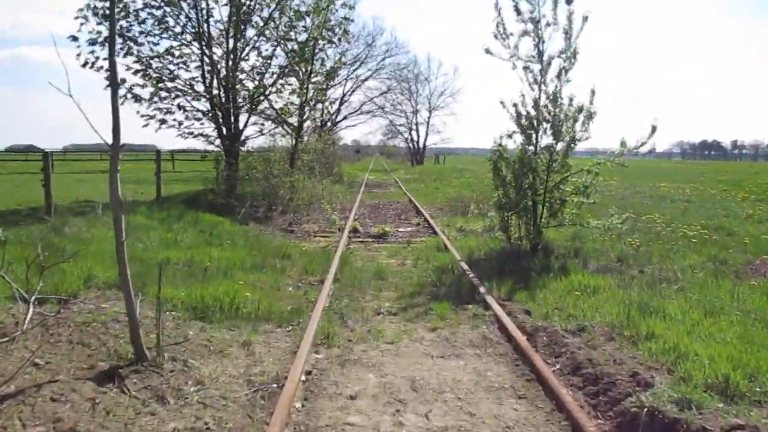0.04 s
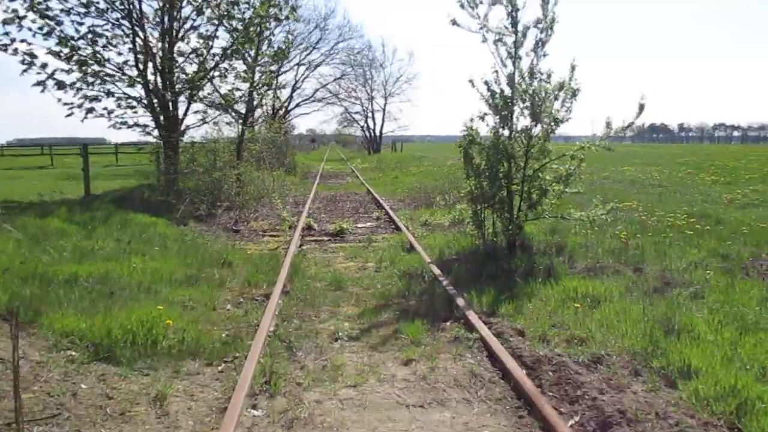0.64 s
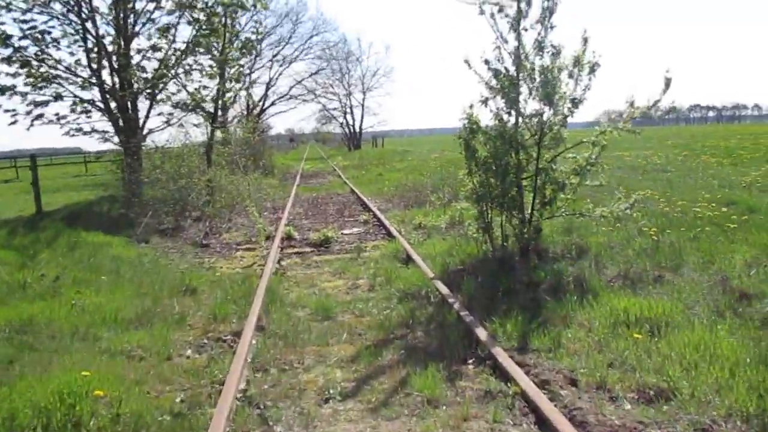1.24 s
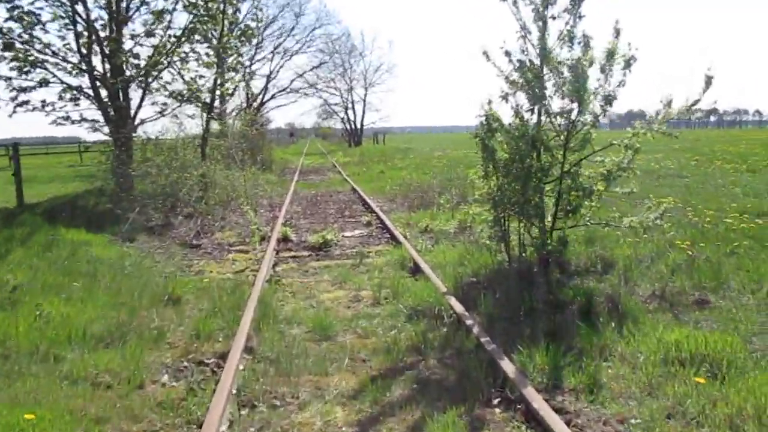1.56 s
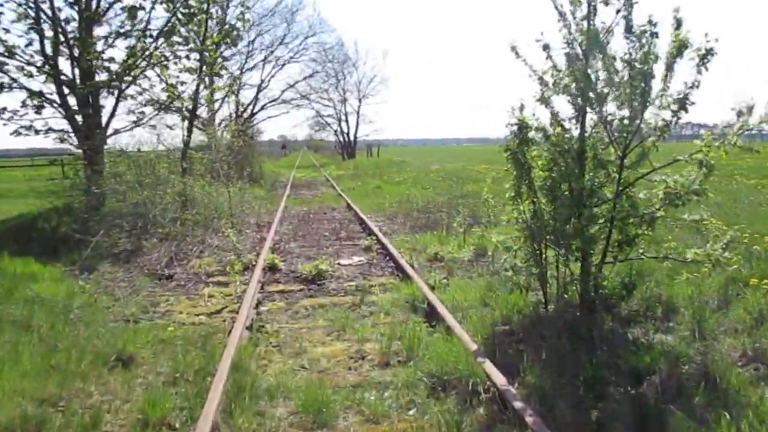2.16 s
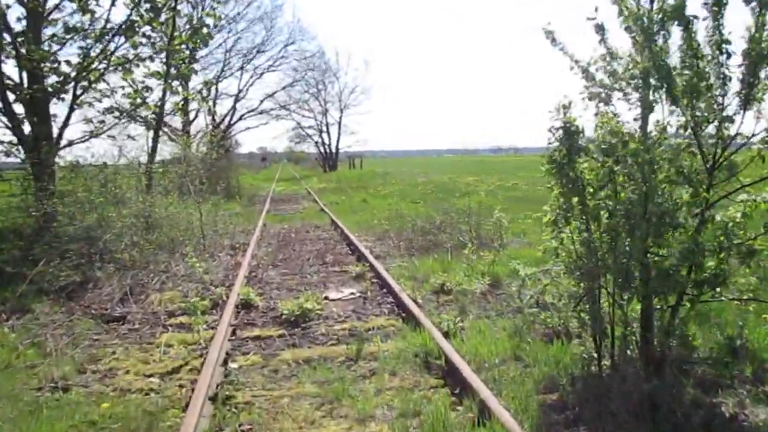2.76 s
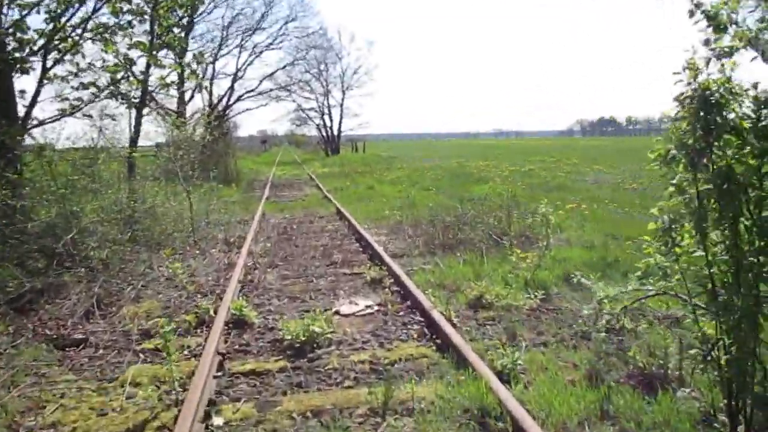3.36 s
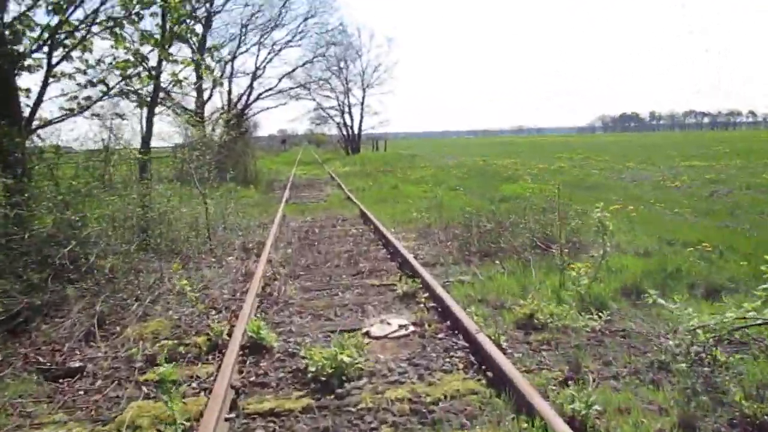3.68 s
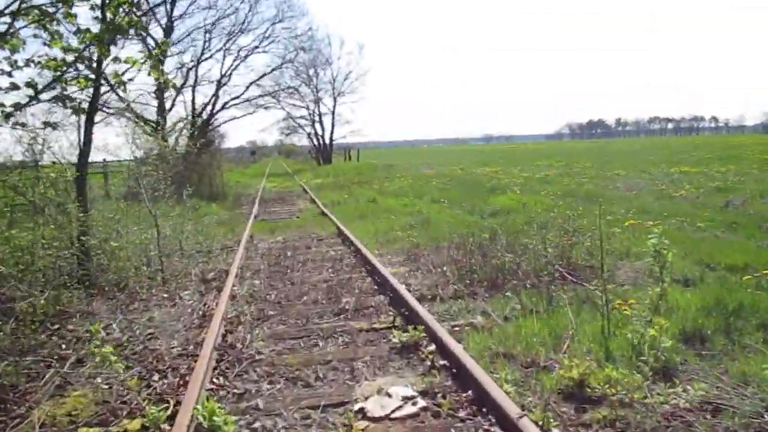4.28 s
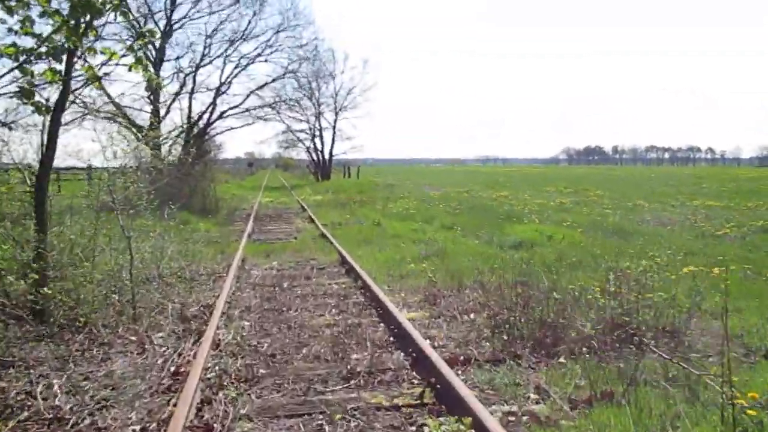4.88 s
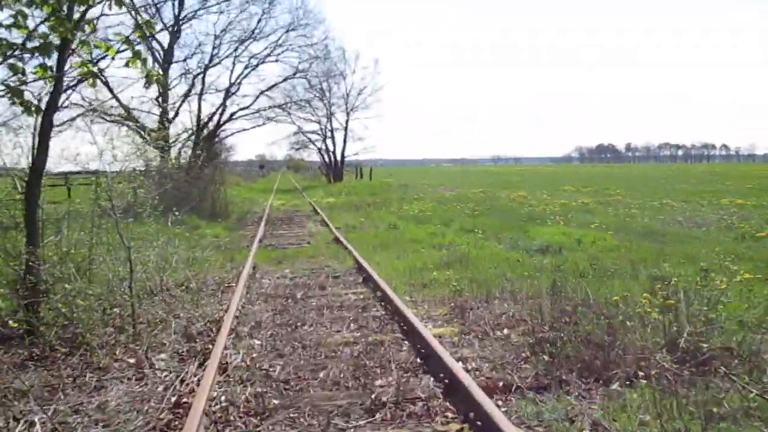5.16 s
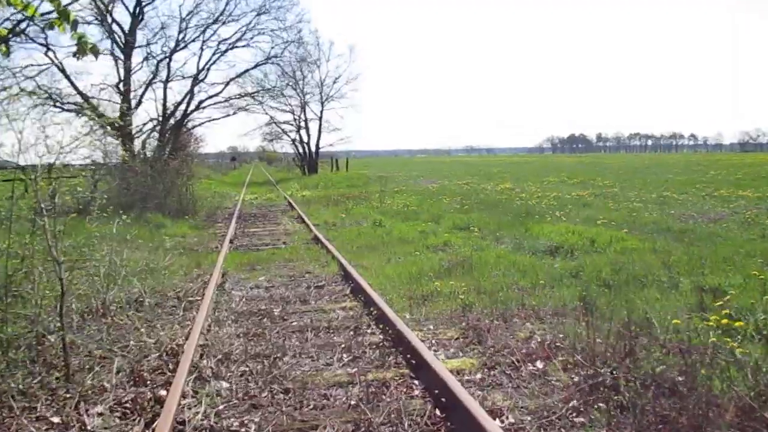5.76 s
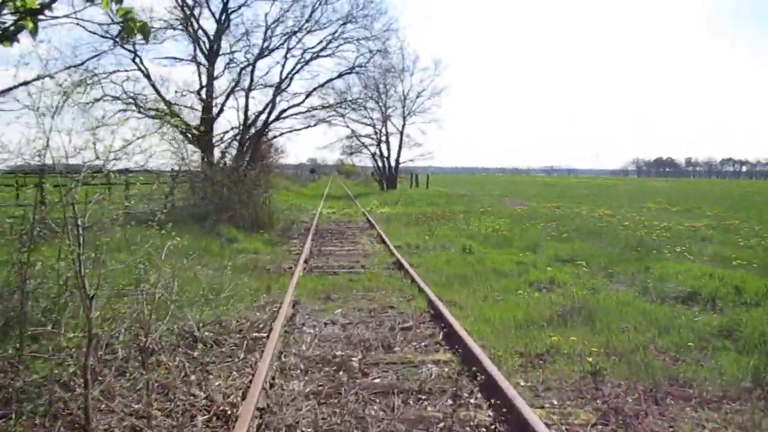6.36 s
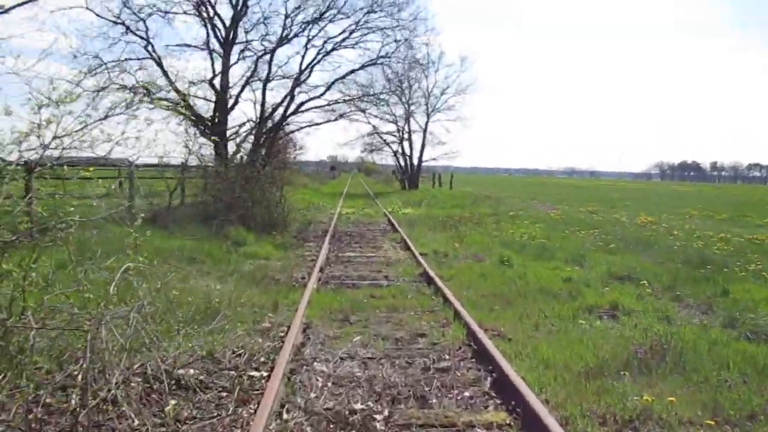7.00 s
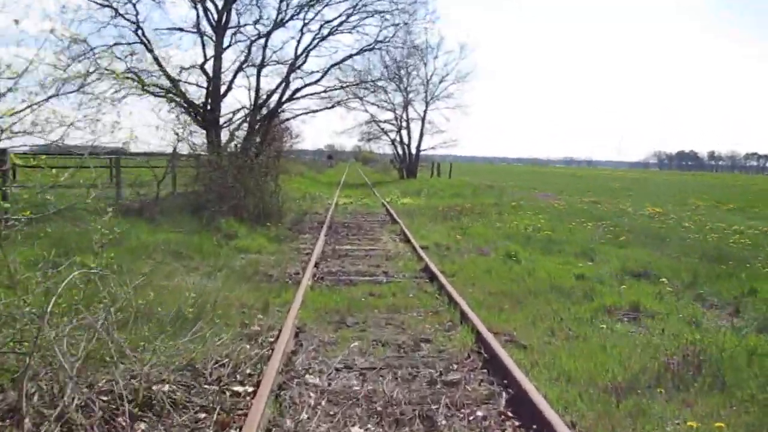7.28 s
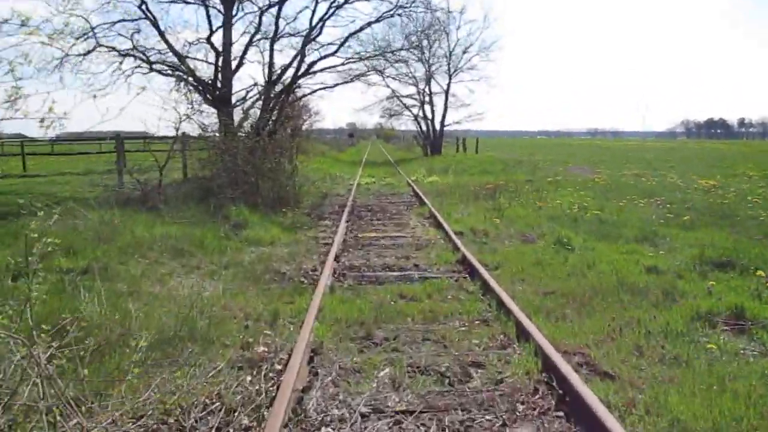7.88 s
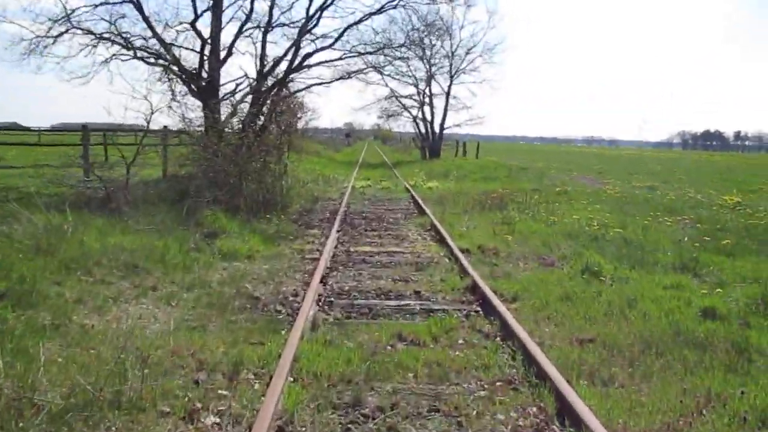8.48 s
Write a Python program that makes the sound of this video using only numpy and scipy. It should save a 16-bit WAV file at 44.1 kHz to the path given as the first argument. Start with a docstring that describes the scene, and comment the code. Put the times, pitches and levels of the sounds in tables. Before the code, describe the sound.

Steady rumble, quick booming jolts and clunks of a rail trolley heard from on board, with thin squeaks, rust grinding and low wind.

```python
"""On board a pedal rail trolley, rolling along a rusty, overgrown track.
Six worn spots per wheel turn jolt it, booming the deck and knocking the frame; the treads
rumble, scuff and grind rust. A part rubs and squeaks once a turn, flanges rasp, loose metal jingles
and ticks. Behind it: grass brushing the frame, low gusts of wind and a far bird whistling."""
import sys
import numpy as np
from scipy import signal
from scipy.fft import rfft, irfft, next_fast_len
from scipy.io import wavfile
from scipy.ndimage import uniform_filter1d

SR = 44100
rng = np.random.default_rng(int(sys.argv[2]) if len(sys.argv) > 2 else 0)


def master(y):
    """Save y as 16-bit WAV."""
    cut = np.clip(np.atleast_2d(y).T, -1, 1)
    pcm = np.round(cut * 32767)  # scale
    wavfile.write(sys.argv[1], SR, pcm.astype(np.int16))


N = 376613


def amp(db):
    """Decibels to gain."""
    return 10 ** (np.asarray(db) / 20)


def unit(x):
    """Scale to rms 1."""
    return x / np.sqrt(np.mean(x ** 2))


def add(out, s, x):
    """Mix x into out from time s on."""
    i = max(int(s * SR), 0)
    out[i:i + len(x)] += x[:max(N - i, 0)]


def band(x, hz, width_hz):
    """One resonance, gain 1 at its centre."""
    return signal.lfilter(*signal.iirpeak(min(hz, .45 * SR), hz / min(width_hz, .3 * SR), fs=SR), x)


def ring(x, modes):
    """Body of steep-skirted resonances; neighbours swing in opposite senses."""
    return sum((-1) ** k * amp(db) * band(band(x, hz, 1.26 * width), hz, 1.26 * width)
               for k, (hz, width, db) in enumerate(modes))


def mode(x, hz, width_hz):
    """Single mode driven by x, rms 1."""
    return unit(ring(x, [(hz, width_hz, 0)]))


def loosen(modes, scatter_db, detune):
    """A part sits differently each time, which shifts its resonances."""
    return [(hz * (1 + detune * rng.standard_normal()), width, db + scatter_db * rng.standard_normal())
            for hz, width, db in modes]


def favour(modes, centre_hz, lift_db, octaves):
    """The place of contact brings out the modes near one pitch."""
    return [(hz, width, db + lift_db * np.exp(-(np.log2(hz / centre_hz) / octaves) ** 2))
            for hz, width, db in modes]


def colour(x, points):
    """Shape x by a (Hz, dB) spectrum that falls away below its first point."""
    hz, db = np.transpose(points)
    n = next_fast_len(len(x))
    f = np.maximum(np.arange(n // 2 + 1) * SR / n, 1)
    gain = amp(np.interp(np.log(f), np.log(hz), db)) * np.minimum(f / hz[0], 1) ** 2
    return irfft(rfft(x, n) * gain, n)[:len(x)]


def walk(rate_hz):
    """Random steps, smoothed twice, rms 1."""
    hold = int(SR / rate_hz)
    steps = np.repeat(rng.standard_normal(N // hold + 1), hold)
    return unit(uniform_filter1d(uniform_filter1d(steps, hold), hold)[:N])


def grains(n, per_s, spread_db):
    """Tiny contacts at random moments, a few harder than the rest."""
    hardness_db = spread_db * np.minimum(rng.exponential(size=n), 4)
    return (rng.random(n) < per_s / SR) * rng.standard_normal(n) * amp(hardness_db)


def swell(t, rise_s, fall_s):
    """Smooth rise, exponential fall."""
    return np.sin(np.pi / 2 * np.minimum(t / rise_s, 1)) ** 2 * np.exp(-np.maximum(t - rise_s, 0) / fall_s)


def chatter(events, body, rise_s, fall_s, per_s):
    """Each event is a short flurry of contacts that rings the body."""
    out, t = np.zeros(N), np.arange(SR // 5) / SR
    for s, db, *pitch in events:
        force = grains(len(t), per_s, spread_db=1.2) * swell(t, rise_s, fall_s)
        add(out, s, amp(db) * unit(body(force, *pitch)))
    return out


def sing(events, width_hz, rise_s, fall_s):
    """Friction makes one metal mode sing briefly and unsteadily."""
    out, t = np.zeros(N), np.arange(SR // 8) / SR
    for s, db, hz in events:
        add(out, s, amp(db) * swell(t, rise_s, fall_s) * mode(rng.standard_normal(len(t)), hz, width_hz))
    return out


# wind strength: t/s, level/dB
GUSTS = [(0.0, -38), (0.81, -42), (0.9, -30), (1.02, -42), (1.95, -47), (2.06, -39), (2.9, -47),
         (2.97, -39), (3.61, -43), (4.4, -45), (4.59, -35), (5.2, -42), (6.18, -46), (6.25, -39),
         (6.6, -45), (7.6, -41), (7.75, -36), (8.1, -42), (8.54, -42)]


def wind(gain_db, gust_db):
    """Air buffets in low, uneven gusts."""
    spectrum = [(20, -5.5), (45, -4.5), (80, -1), (110, 4), (220, -14), (1000, -73)]
    air = unit(colour(rng.standard_normal(N), spectrum))
    level_db = np.interp(np.arange(N) / SR, *np.transpose(GUSTS))
    return air * amp(gain_db + level_db + gust_db * walk(9.8))


# low and high whistles: t/s, start f/Hz, rise/Hz, level/dB
WHISTLES = [(5.56, 4290, 60, -59.5), (6.085, 3860, 330, -53), (6.225, 4920, 160, -57),
            (6.53, 3960, 220, -58), (6.64, 4920, 160, -60.5), (6.93, 3880, 330, -56),
            (7.09, 4940, 100, -62), (7.37, 3930, 220, -61)]


def bird(length_s):
    """Near-pure whistles slide up and flutter on their way through the trees."""
    out, progress = np.zeros(N), np.linspace(0, 1, int(length_s * SR))
    for s, start_hz, rise_hz, db in WHISTLES:
        hz = start_hz + rise_hz * progress + 35 * walk(350)[:len(progress)]
        add(out, s, amp(db) * np.sin(np.pi * progress) * np.sin(2 * np.pi * np.cumsum(hz) / SR))
    return out * amp(3 * walk(90))


# passing stalks: t/s, length/s, level/dB, f/Hz, width/Hz
STALKS = [(0.97, 0.25, -57, 3620, 980), (4.38, 0.2, -61, 8050, 6030), (6.972, 0.38, -59.5, 8450, 9050)]


def grass():
    """Stalks hiss along the frame."""
    out = np.zeros(N)
    for s, length_s, db, hz, width_hz in STALKS:
        n = int(length_s * SR)
        contacts = grains(n, per_s=8000, spread_db=1.5)
        hiss = unit(band(band(contacts, hz, width_hz), hz, width_hz))
        add(out, s, amp(db) * signal.windows.tukey(n, .5) * hiss)
    return out


# thin peeps: t/s, level/dB, f/Hz
METAL_PEEPS = [(4.345, -70, 14480), (7.388, -72, 14420), (7.665, -74, 14420), (7.903, -67, 14400)]


def peeps():
    """Dry metal sings very high up."""
    return sing(METAL_PEEPS, width_hz=220, rise_s=.012, fall_s=.012)


# single rust flakes: t/s, level/dB, f/Hz
FLAKE_SNAPS = [(1.765, -58, 9000), (1.897, -57, 9500), (2.24, -59, 7000), (2.905, -58, 9500),
               (3.066, -58, 9500), (3.412, -61, 10500), (3.865, -56, 9000), (3.897, -54, 9500),
               (4.05, -60, 9000), (4.085, -58, 9000), (4.60, -51, 8400), (4.632, -54, 8400),
               (5.405, -55, 9500), (5.552, -59, 10000), (5.846, -54, 9000), (5.919, -56, 10000),
               (6.187, -55, 10000), (6.22, -61, 10500), (6.595, -58, 9900), (6.785, -53, 9000),
               (8.003, -55, 9500), (8.04, -51, 7000)]


def snaps():
    """A flake breaks under a wheel in a few milliseconds of bright splinters."""
    flake = lambda force, hz: mode(force, hz, width_hz=5000)
    return chatter(FLAKE_SNAPS, flake, rise_s=.001, fall_s=.004, per_s=2500)


# close ticks: t/s, level/dB, f/Hz
METAL_TICKS = [(0.621, -42, 4300), (0.924, -38.5, 3700), (2.164, -28.5, 3600), (2.4127, -28.5, 3500),
               (2.9783, -31.5, 4000), (3.517, -35.5, 4100), (3.9997, -31.5, 3770), (4.491, -32.5, 3750),
               (4.994, -41, 3750), (5.459, -36, 4170), (6.63, -46, 4230)]


def ticks(fall_s):
    """Loose metal gives a tiny hard snap with a very short ring."""
    out, t = np.zeros(N), np.arange(SR // 50) / SR
    for s, db, hz in METAL_TICKS:
        snap = rng.standard_normal(len(t)) * np.exp(-t / fall_s)
        tick = mode(snap, hz, 900) + amp(-7) * mode(snap, 6200, 1300) + amp(-2.5) * mode(snap, 3150, 1040)
        add(out, s, amp(db) * tick)
    return out


# loose metal modes: f/Hz, width/Hz, level/dB
METAL_MODES = [(2050, 160, -3), (2520, 180, 0), (2950, 200, 0), (3550, 600, -3), (4400, 500, 0),
               (5000, 400, -1), (5620, 400, 1), (6300, 400, -1), (7050, 600, -2), (7800, 550, -4),
               (8550, 600, -4), (9850, 550, -8), (10900, 900, -11), (13000, 2500, -18)]
# clinks: t/s, level/dB, f/Hz, decay/s
CLINKS = [(0.174, -41, 3300, 0.028), (.262, -55, 2850, 0.011), (.735, -52, 8000, 0.013),
          (.778, -57, 2900, .015), (1.039, -53, 7000, 0.028), (1.135, -60, 5000, .015),
          (1.199, -43, 5000, 0.026), (1.283, -52, 8500, 0.015), (1.52, -52.5, 5600, .012),
          (1.70, -51.5, 4750, 0.014), (1.785, -49, 2700, 0.018), (2.062, -55, 10000, 0.014),
          (2.283, -43, 2900, 0.018), (2.309, -50.5, 7500, 0.0069), (2.445, -50, 5500, 0.022),
          (2.631, -41.5, 7500, 0.0066), (2.781, -53, 2900, .012), (2.838, -45.5, 8500, .019),
          (2.997, -57, 5500, 0.011), (3.092, -52, 8000, 0.009), (3.127, -49, 4000, 0.0088),
          (3.19, -53, 5000, 0.01), (3.272, -51, 8500, .03), (3.33, -48, 9450, 0.012),
          (3.446, -49, 3600, .02), (3.677, -48.5, 3600, .025), (3.763, -49.5, 10000, .03),
          (3.92, -49, 5000, 0.024), (4.225, -42.5, 3000, 0.024), (4.335, -49, 3100, .022),
          (4.456, -43, 4980, 0.028), (4.527, -48, 8500, 0.015), (4.778, -54, 9500, 0.0072),
          (4.93, -47, 7500, 0.018), (5.165, -53, 7000, .01), (5.26, -46.5, 2600, .018),
          (5.475, -42.5, 5600, 0.033), (5.642, -46.5, 7000, 0.017), (5.705, -46, 2400, 0.039),
          (5.776, -46, 9000, 0.027), (5.942, -41.5, 2220, 0.041), (5.989, -36.5, 2900, 0.033),
          (6.019, -47, 5000, .018), (6.295, -52, 2580, .022), (6.469, -54, 2200, .016),
          (6.527, -40.5, 5500, 0.025), (6.99, -48, 2500, .022), (7.05, -34.5, 5400, 0.025),
          (7.571, -31.5, 6500, 0.02), (7.735, -41.5, 6500, 0.029), (8.079, -30.5, 4700, .024)]


def jingles():
    """Loose metal chatters, its modes shifting from clink to clink."""
    def metal(force, hz):
        modes = loosen(METAL_MODES, scatter_db=2, detune=.025)
        return ring(force, favour(modes, hz, lift_db=10, octaves=.7))
    return sum(chatter([(s, db, hz)], metal, rise_s=.008, fall_s=fall_s, per_s=2500)
               for s, db, hz, fall_s in CLINKS)


# flange contacts: t/s, level/dB, f/Hz
FLANGE_RASPS = [(.19, -36, 2080), (.215, -25.5, 910), (1.44, -61, 4630), (2.73, -36.5, 1290),
                (3.27, -36.5, 1300), (3.785, -37, 1280), (4.405, -50, 4700), (4.41, -42, 2000),
                (4.91, -44, 2050), (5.19, -42, 1340), (6.99, -54, 4600)]


def flanges():
    """A flange catches the rail and one wheel mode rasps."""
    return sing(FLANGE_RASPS, width_hz=260, rise_s=.008, fall_s=.022)


# modes of the rub and of the squeak: f/Hz, width/Hz, level/dB
RUB_RESONANCES = [(2500, 160, 6), (2860, 290, 9), (4200, 700, -23), (5270, 1400, -13), (7700, 990, -14),
                  (10800, 1800, -23)]
SQUEAK_RESONANCES = [(2730, 170, 2), (3030, 220, -1.5), (5400, 480, -12.5), (5850, 520, -11),
                     (7800, 2400, -22)]
# wheel turns, about 2 per s: t/s, boom/dB, knock/dB, rub/dB, squeak/dB, squeak delay/s
WHEEL_TURNS = [(-.262, -18, -26, -58, -56, .07), (0.27, -24, -27, -53, -55, 0.076),
               (0.792, -17.5, -26, -53, -51, 0.079), (1.291, -24, -25, -58, -41.5, 0.067),
               (1.797, -22, -22, -55, -44, 0.069), (2.29, -22, -36, -45, -54, 0.071),
               (2.781, -9, -28.5, -52, -39.5, 0.065), (3.271, -19, -20, -53, -55, 0.051),
               (3.766, -20, -21, -49.5, -48.5, 0.072), (4.26, -13, -31, -46, -50, 0.08),
               (4.75, -15.5, -18, -54.5, -44, 0.079), (5.255, -17.5, -24, -47.5, -42, 0.084),
               (5.778, -12, -21, -41, -38.5, 0.071), (6.296, -21, -27, -49.5, -39.5, 0.082),
               (6.82, -20, -21, -44.5, -34, 0.081), (7.339, -11.5, -27, -39.5, -38, 0.084),
               (7.858, -10.5, -27, -38.5, -31.5, 0.078), (8.37, -18, -34, -44.5, -34, 0.074)]


def rub_and_squeak():
    """A part rubs once a turn; a dry squeak follows."""
    rubs = [(s, db) for s, _, _, db, _, _ in WHEEL_TURNS if s > 0]
    squeaks = [(s + delay_s, db) for s, _, _, _, db, delay_s in WHEEL_TURNS if s > 0]
    rub_body = lambda force: ring(force, loosen(RUB_RESONANCES, scatter_db=2, detune=.018))
    squeak_body = lambda force: ring(force, loosen(SQUEAK_RESONANCES, scatter_db=1.5, detune=.018))
    rub = chatter(rubs, rub_body, rise_s=.007, fall_s=.026, per_s=2000)
    squeak = chatter(squeaks, squeak_body, rise_s=.007, fall_s=.023, per_s=3000)
    return amp(-6.5) * rub + amp(-14.8) * squeak


# rust flakes, coarse to fine: f/Hz, width/Hz, level/dB
GRIT_BANDS = [(4440, 2100, -26.5), (6660, 7500, -30), (9000, 4000, -28.5)]


def grit():
    """Rust cracks under the wheels in dense flurries shared by all flake sizes."""
    flurry = amp(6 * np.clip(walk(55), -2, 1.7))
    return sum(amp(db) * mode(grains(N, per_s=2500, spread_db=2.2) * flurry, hz, width_hz)
               for hz, width_hz, db in GRIT_BANDS)


def scuffing(events, rise_s, fall_s):
    """Envelope of a tread dragging over the rail after each jolt."""
    out, t = np.zeros(N), np.arange(SR // 5) / SR
    for s, db in events:
        add(out, s, amp(db) * swell(t, rise_s, fall_s))
    return out


# modes of deck, frame and steel wheels: f/Hz, width/Hz, level/dB
DECK_MODES = [(133.8, 14.2, 0.5), (170.2, 28, -8), (192, 18, -2.5), (235, 159, -16.5)]
FRAME_MODES = [(240.3, 36.8, 8), (304.2, 2.9, -3.5), (343, 7.9, -7), (395, 35, -2), (448.4, 30, 0.5),
               (522.7, 48.6, -0.5), (628.4, 38, -5.5), (696.5, 63, -9), (806, 48, -1), (867, 63, -3.5),
               (902.4, 69, -1)]
WHEEL_MODES = [(1193, 27, -1.5), (1278, 10, 11.5), (1720, 120, -3), (1990, 130, -1.5), (2100, 60, 1.5),
               (2468, 240, -2), (2674, 29, -4), (2992, 60, -5.5)]
# ground rust: f/Hz, level/dB
RUST_SPECTRUM = [(600, 0), (1000, 5.5), (1300, 1.5), (1650, -1.5), (2080, -9), (2280, -6), (2500, -23.5),
                 (3100, -8.5), (3700, -16), (5500, -23), (8000, -25.5), (11000, -37.5), (13500, -45),
                 (15800, -61)]
# steady rolling: t/s, rumble/dB, grinding/dB
ROLL_LEVELS = [(0.0, -28, -43.5), (0.43, -27.5, -49.5), (1.14, -25, -44.5), (1.5, -30, -50),
               (1.97, -25.5, -45), (2.6, -27, -44.5), (3.14, -27.5, -45), (4.381, -22, -41),
               (4.92, -26, -45.5), (5.76, -23, -42), (6.25, -26, -44), (7.281, -23.5, -41.5),
               (7.52, -25.5, -39.5), (7.94, -20.5, -41), (8.54, -23, -41)]


def rolling(scuff):
    """Rough treads shake deck, frame and wheels and grind rust, harder as they scuff; the load wavers."""
    s, *levels_db = np.transpose(ROLL_LEVELS)
    rumble, grinding = (amp(np.interp(np.arange(N) / SR, s, db)) for db in levels_db)
    rumble = np.hypot(amp(4) * rumble, amp(3) * scuff)
    grinding = np.hypot(amp(-1.5) * grinding, amp(-26) * scuff)
    load = walk(45)
    deck = amp(-1.5) * unit(ring(rng.standard_normal(N), DECK_MODES))
    bumps = grains(N, per_s=4000, spread_db=1.6) * amp(1.8 * load)
    frame = amp(-8.8) * unit(ring(bumps, FRAME_MODES))
    flakes = grains(N, per_s=7000, spread_db=1.9) * amp(3 * load)
    rust = amp(1.6) * unit(colour(flakes, RUST_SPECTRUM))
    pecks = grains(N, per_s=1500, spread_db=2.6) * amp(2.7 * load)
    wheel = amp(-4.5) * unit(ring(pecks, WHEEL_MODES))
    return (deck + frame) * rumble + (rust + wheel + grit()) * grinding


# hollow wheel modes: f/Hz, width/Hz, level/dB
HOLLOW_MODES = [(865.7, 50, -1.5), (937.7, 60, 0.5)]


def hollow_ring(scuff):
    """The wheel rings all the time, more while its tread drags."""
    s, rumble_db, _ = np.transpose(ROLL_LEVELS)
    steady = amp(np.interp(np.arange(N) / SR, s, rumble_db) - 16)
    wheel = unit(ring(grains(N, per_s=1600, spread_db=.5), HOLLOW_MODES))
    return wheel * np.hypot(amp(-11) * scuff, steady)


# rough stretches of rail: t/s, length/s, level/dB, f/Hz
ROUGH_RAIL = [(1.193, 0.091, -30.5, 750), (3.192, 0.11, -31, 650), (4.081, 0.035, -31, 696),
              (4.583, 0.13, -32.5, 650), (5.701, .11, -27.5, 630), (6.741, 0.086, -28.5, 750),
              (6.825, 0.039, -29, 650), (7.057, 0.053, -32.5, 550), (7.264, 0.085, -28, 840),
              (7.338, 0.059, -24.5, 590), (7.567, 0.035, -29, 690), (7.785, 0.17, -31.5, 740),
              (8.291, .06, -26.5, 700), (8.372, 0.045, -29, 700)]


def scrapes(taper, wheel_db):
    """A ragged run of small contacts swells through frame and wheel."""
    def force(n):
        contacts = grains(n, per_s=2500, spread_db=.8) * signal.windows.tukey(n, taper)
        return np.pad(contacts, (0, SR // 30))
    out = np.zeros(N)
    for s, length_s, db, hz in ROUGH_RAIL:
        n = int(length_s * SR)
        drag = force(n)
        modes = loosen(FRAME_MODES + HOLLOW_MODES, scatter_db=2, detune=.02)
        frame = unit(ring(drag, favour(modes, hz, lift_db=10, octaves=.8)))
        wheel = mode(force(n), hz=1250, width_hz=320)
        add(out, s, amp(db) * (frame + amp(wheel_db) * wheel))
    return out


# worn spots on the treads: place/turn, boom/dB, knock/dB, scuff/dB, chance of low deck mode/0-1
WORN_SPOTS = [(.002, 4.5, -7, -4, .2), (.172, 7, -19.5, -4, .4), (.345, 5, -9, -15.5, .05),
              (0.48, 0, 0, -2, .05), (.662, -1, -15, -12, .15), (0.848, 5.5, -9.5, 0, .05)]
# individual wheel jolts: t/s, boom/dB, knock/dB, boom f/Hz, knock f/Hz
WHEEL_JOLTS = [(0.003, -16.5, -22.5, 187.5, 820), (0.092, -14.5, -24, 172, 457),
               (0.182, -5.5, -23, 176.7, 870), (0.265, -5.5, -29, 179, 350),
               (0.529, -10.5, -27, 184.3, 496), (0.621, -10.5, -26, 169, 523), (0.785, -14, -27, 185, 476),
               (1.042, -11.5, -29, 177, 463), (1.135, -5.5, -28, 186, 507), (1.218, -2.5, -36, 187.5, 890),
               (1.289, -4.5, -26.5, 175.4, 485), (1.544, -15, -29.5, 163.6, 460),
               (1.625, -11.5, -30.5, 171, 450), (1.723, -11, -27.5, 174, 450),
               (1.795, -9.5, -26.5, 170, 477), (1.965, -13, -33, 177, 448), (2.041, -7.5, -23.5, 182, 525),
               (2.125, -13.5, -28.5, 139, 860), (2.161, -16, -36, 140, 453), (2.288, -6.5, -24.5, 178, 500),
               (2.457, -9, -28.5, 183.3, 450), (2.622, -7.5, -24.5, 181, 470), (2.716, -14, -27, 171, 333),
               (2.782, -11, -26, 136, 520), (2.869, -5.5, -35, 179, 830), (2.955, -9, -37, 164.6, 450),
               (3.026, -12, -29, 189.5, 716), (3.106, -4, -31, 172, 346), (3.195, -9.5, -30, 169.7, 950),
               (3.27, -7, -23.5, 130, 940), (3.452, -10, -26.5, 142.4, 635), (3.514, -22, -24, 172, 440),
               (3.692, -5.5, -23, 178.2, 500), (3.771, -9, -24.5, 171, 540), (3.934, -7.5, -28.5, 145, 910),
               (4.01, -13, -20.5, 129, 540), (4.096, -12.5, -25, 175, 770), (4.17, -4.5, -26, 164.4, 450),
               (4.263, -12.5, -20, 147, 477), (4.338, -4.5, -31, 172.5, 900), (4.497, -7, -23.5, 177, 407),
               (4.587, -6.5, -26.5, 168.7, 342), (4.674, -2, -28.5, 176.4, 440),
               (4.752, -14.5, -34, 158.4, 910), (4.835, -12, -39, 166, 450), (4.913, -12, -38, 161.7, 450),
               (4.998, -18, -27, 160.5, 406), (5.092, -12, -28.5, 175, 460), (5.189, -9, -23, 169, 510),
               (5.267, -11.5, -26, 176.2, 433), (5.357, -12, -33, 169, 460), (5.511, -23, -27, 190, 840),
               (5.618, -16, -26, 166, 540), (5.703, -11.5, -24.5, 187.5, 780), (5.866, -4.5, -28, 139, 930),
               (5.96, -3, -23.5, 164, 445), (6.032, -13, -28, 173, 447), (6.135, -9, -30.5, 165, 440),
               (6.225, -6.5, -23, 179, 420), (6.283, -4, -22.5, 166, 440), (6.548, -14, -21.5, 149, 435),
               (6.646, -14, -25, 136.7, 710), (6.682, -14.5, -34, 153.6, 450),
               (6.756, -11.5, -22, 196, 520), (6.831, -9.5, -23, 180, 490), (6.909, -6.5, -37, 169, 450),
               (6.983, -12, -26, 144.7, 446), (7.023, -8.5, -30, 171, 450), (7.07, -34, -20.5, 146.5, 442),
               (7.155, -13.5, -34, 167.6, 880), (7.205, -11.5, -38, 140.5, 453),
               (7.273, -7.5, -23, 178, 450), (7.356, -8.5, -20.5, 180, 480), (7.432, -3.5, -30, 169, 440),
               (7.523, -8, -33, 158, 450), (7.573, -6, -21.5, 166.7, 950), (7.677, -7.5, -33, 161, 450),
               (7.788, -7.5, -24, 182, 875), (7.862, -8, -26, 171.7, 450), (7.945, -5.5, -37, 146, 453),
               (8.038, -8.5, -26, 153, 450), (8.087, -5.5, -23.5, 172, 420), (8.205, -6, -33, 167, 430),
               (8.299, -4, -25.5, 185, 520), (8.375, -15, -23, 126, 475), (8.44, -7.5, -37, 146.5, 450)]
DECK_LOW_HZ, DECK_HIGH_HZ = 134.24, 175.4


def jolts(scatter_s, scatter_db, spot_knock_hz):
    """The listed wheel jolts, plus one per worn spot and turn where none is listed within 45 ms."""
    rows = [(s, boom_db, knock_db, knock_db - 2, boom_hz, knock_hz)  # scuff 2 dB under the knock
            for s, boom_db, knock_db, boom_hz, knock_hz in WHEEL_JOLTS]
    listed_s = np.transpose(WHEEL_JOLTS)[0]
    turns_s = np.transpose(WHEEL_TURNS)[0]
    turns_s = np.append(turns_s, 2 * turns_s[-1] - turns_s[-2])
    for turn, (_, turn_boom_db, turn_knock_db, *_) in enumerate(WHEEL_TURNS):
        for place, boom_db, knock_db, scuff_db, low_chance in WORN_SPOTS:
            late, heavy, detune = rng.standard_normal(3)
            s = np.interp(turn + place, np.arange(len(turns_s)), turns_s) + scatter_s * late
            boom_hz = (DECK_LOW_HZ if rng.random() < low_chance else DECK_HIGH_HZ) * (1 + .018 * detune)
            if s > 0 and np.min(abs(listed_s - s)) > .045:
                rows.append((s, turn_boom_db + boom_db + scatter_db * heavy, turn_knock_db + knock_db,
                             turn_knock_db + scuff_db, boom_hz, spot_knock_hz))
    return np.array(rows)


def strike(t, modes, scatter_db):
    """One blow sets the modes ringing; the place of contact changes their shares."""
    hz, width_hz, db = np.transpose(modes)[:, :, None]
    share, detune, phase = rng.standard_normal((3, len(modes), 1))
    decay = amp(db + scatter_db * share) * np.exp(-np.pi * width_hz * t)
    return np.sum(decay * np.sin(2 * np.pi * (hz * (1 + .013 * detune) * t + phase)), axis=0)


def frame_knocks(events, rise_s, bounce_s, bounce_db):
    """Each jolt rings the frame and crushes rust; the wheel lands twice more."""
    clunk, t = np.zeros(N), np.arange(SR // 8) / SR
    contact = swell(t, rise_s, np.inf)  # rolling in rounds the blow
    for s, db, hz in events:
        modes = favour(FRAME_MODES, hz, lift_db=13, octaves=.22)
        blows = np.zeros(len(t))
        for landing in range(3):
            lag = int(landing * bounce_s * rng.uniform(.7, 1.3) * SR)
            blow = unit(contact * strike(t, modes, scatter_db=5.5))
            blows[lag:] += amp(landing * bounce_db) * blow[:len(t) - lag]
        add(clunk, s, amp(db) * unit(blows))
    rust = lambda force: ring(force, [(1210, 460, 4), (3120, 1200, -7)])
    crunch = chatter([(s, db) for s, db, _ in events], rust, rise_s=.0047, fall_s=.013, per_s=5700)
    return amp(-4) * clunk + amp(-31) * crunch


def deck_booms(events, lead_s, rise_s, fall_s, partner_db, roughness):
    """The deck dips just before each landing; two modes beat until the load stops them."""
    out, t = np.zeros(N), np.arange(SR // 5) / SR
    drive = swell(t, rise_s, np.inf) * np.exp(-(np.maximum(t - rise_s, 0) / fall_s) ** 2)
    for s, db, hz in events:
        phase = rng.uniform(0, 2 * np.pi, 2)
        partner_hz = DECK_LOW_HZ if hz > (DECK_LOW_HZ + DECK_HIGH_HZ) / 2 else DECK_HIGH_HZ
        partner_hz *= 1 + .074 * rng.standard_normal()
        swing = np.sin(2 * np.pi * hz * t + phase[0])
        partner = amp(partner_db) * np.sin(2 * np.pi * partner_hz * t + phase[1])
        shake = roughness * mode(rng.standard_normal(len(t)), hz, width_hz=70)
        add(out, s - lead_s, amp(db) * drive * (swing + partner + shake))
    radiation = signal.butter(3, 96.4, "high", fs=SR, output="sos")  # the deck radiates little deep bass
    return signal.sosfilt(radiation, out)


def scene():
    """Mono mix of trolley, grass, bird and wind; the same jolts drive deck, frame and treads."""
    rows = jolts(scatter_s=.0025, scatter_db=3, spot_knock_hz=463)
    s, boom_db, knock_db, scuff_db, boom_hz, knock_hz = rows.T
    deck = amp(-1) * deck_booms(zip(s, boom_db, boom_hz), lead_s=.016, rise_s=.023, fall_s=.033,
                                partner_db=-7.5, roughness=.27)
    frame = frame_knocks(list(zip(s, knock_db, knock_hz)), rise_s=.003, bounce_s=.009, bounce_db=-5.5)
    scuff = scuffing(zip(s, scuff_db), rise_s=.024, fall_s=.042)
    treads = rolling(scuff) + hollow_ring(scuff) + scrapes(taper=.37, wheel_db=-17.5)
    rattles = rub_and_squeak() + amp(-15) * jingles() + amp(-14.3) * ticks(fall_s=.0018)
    details = amp(-19) * snaps() + flanges() + peeps()
    background = grass() + bird(length_s=.105) + wind(gain_db=7.5, gust_db=1)
    return (deck + frame + treads + rattles + details + background)[None]


def record(dry):
    """Round the highest peaks, then low-pass at 15.8 kHz."""
    rounded = dry / (1 + (dry / .95) ** 4) ** .25
    return signal.sosfilt(signal.ellip(8, .2, 70, 15800, fs=SR, output="sos"), rounded)


dry = scene()
out = record(dry)
master(out)
```